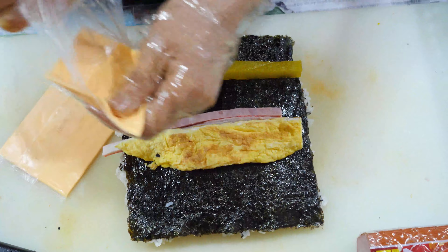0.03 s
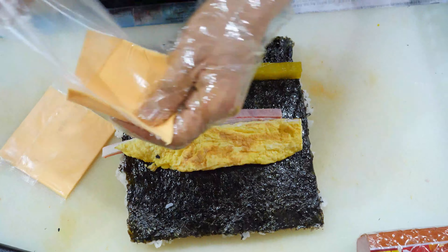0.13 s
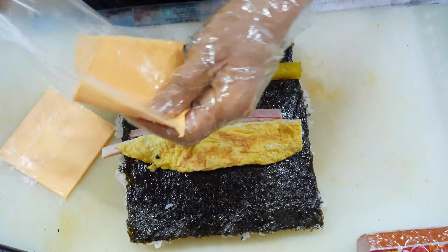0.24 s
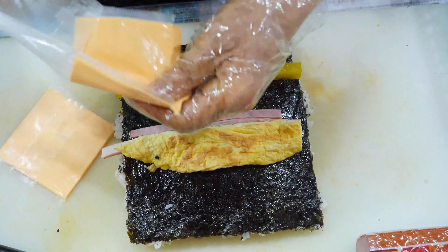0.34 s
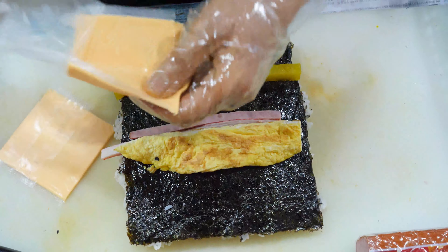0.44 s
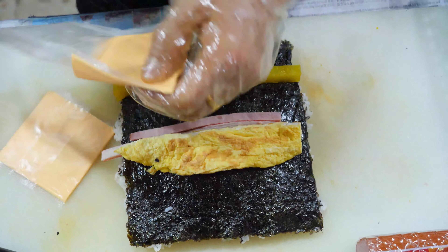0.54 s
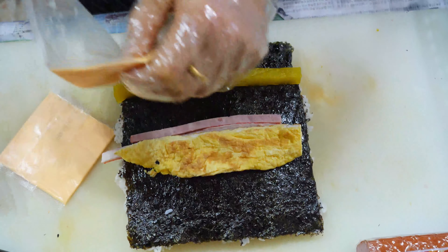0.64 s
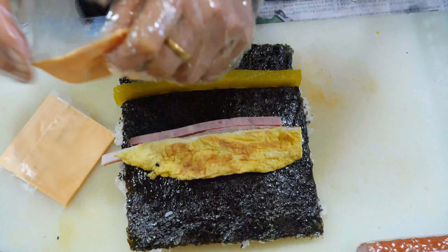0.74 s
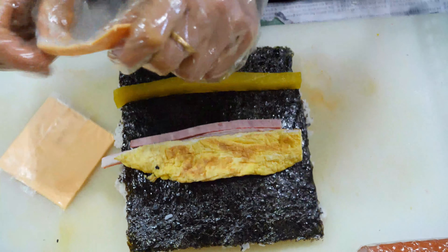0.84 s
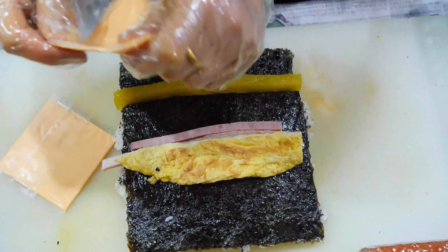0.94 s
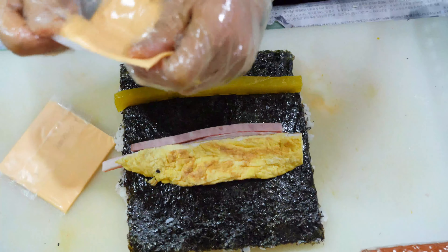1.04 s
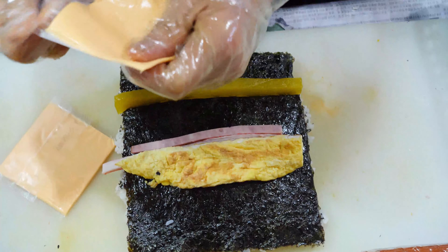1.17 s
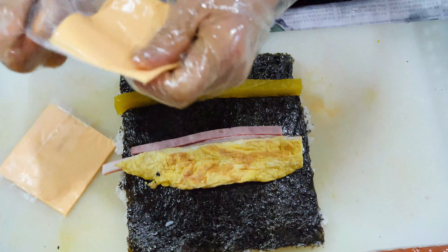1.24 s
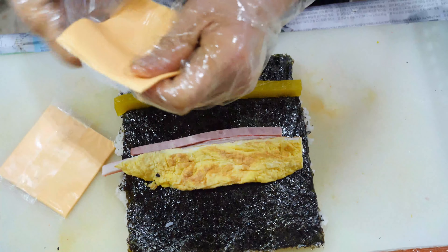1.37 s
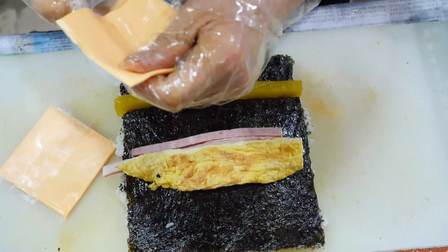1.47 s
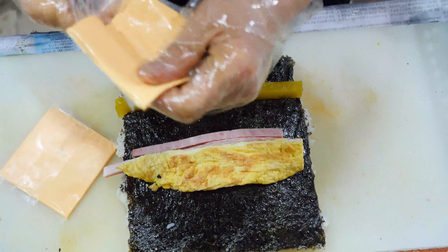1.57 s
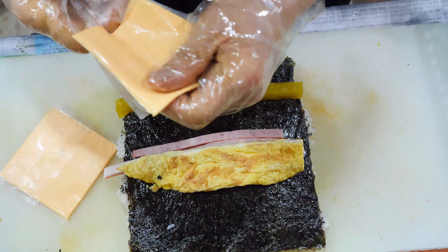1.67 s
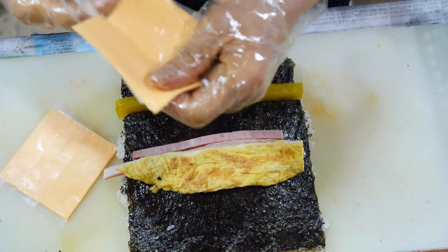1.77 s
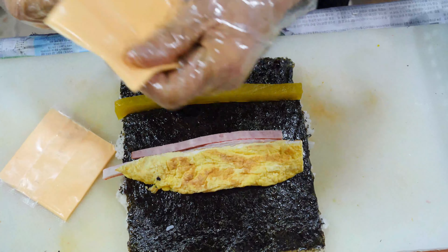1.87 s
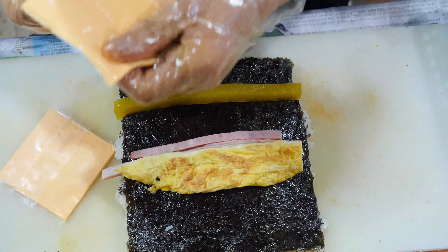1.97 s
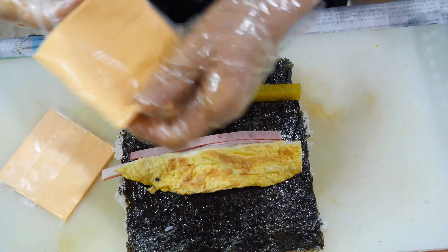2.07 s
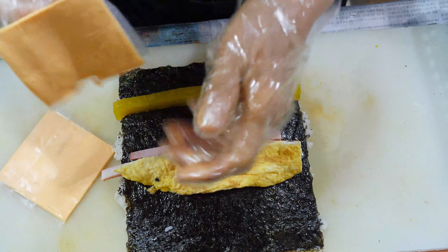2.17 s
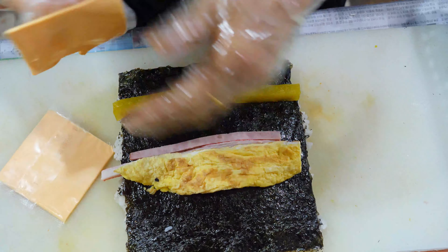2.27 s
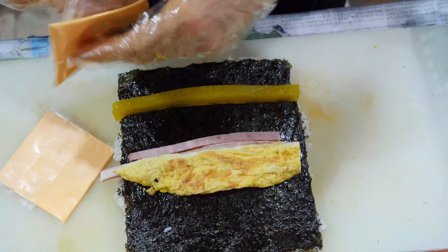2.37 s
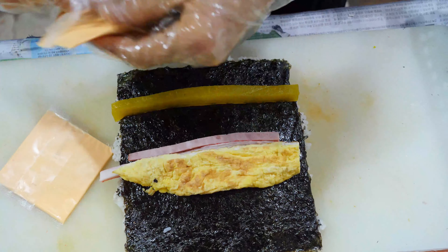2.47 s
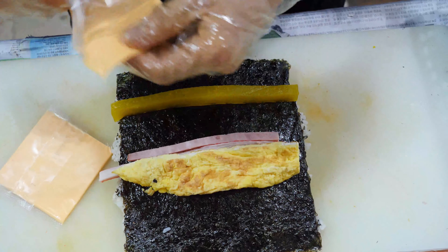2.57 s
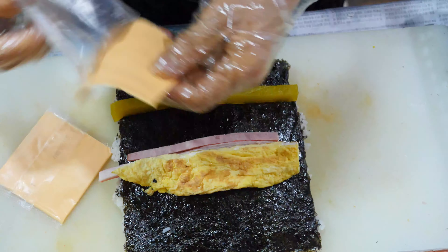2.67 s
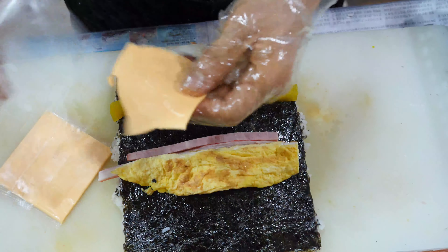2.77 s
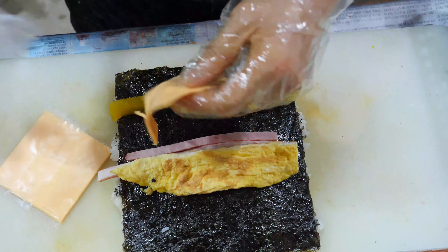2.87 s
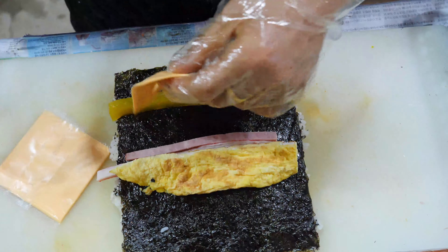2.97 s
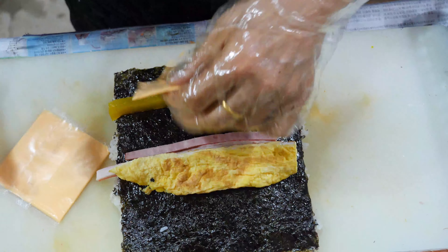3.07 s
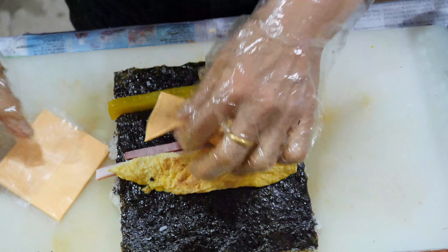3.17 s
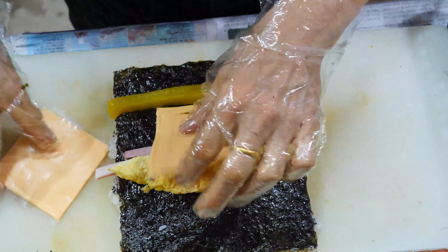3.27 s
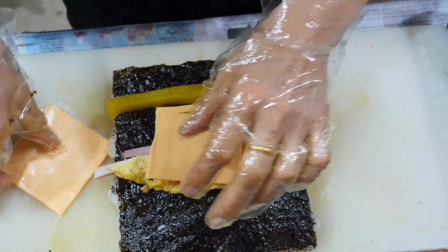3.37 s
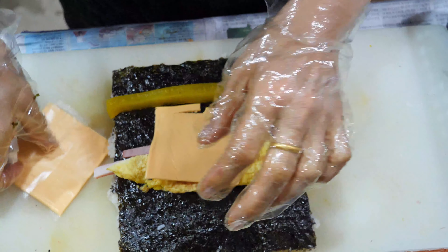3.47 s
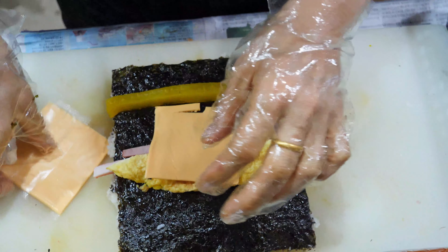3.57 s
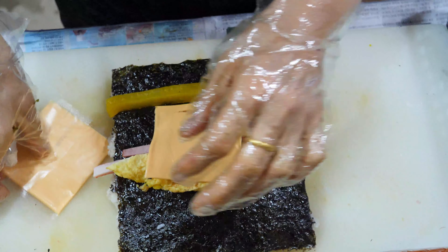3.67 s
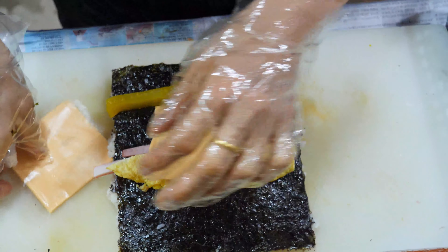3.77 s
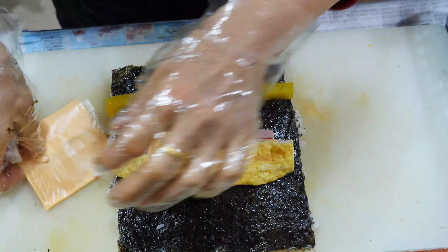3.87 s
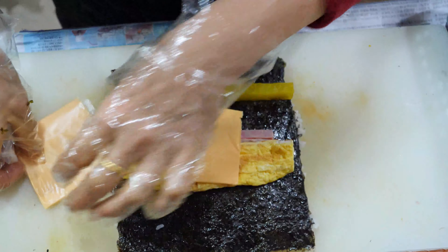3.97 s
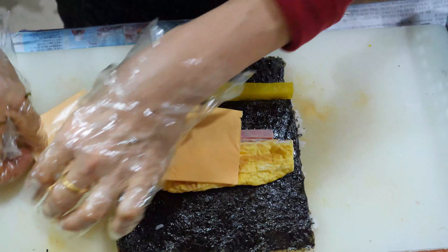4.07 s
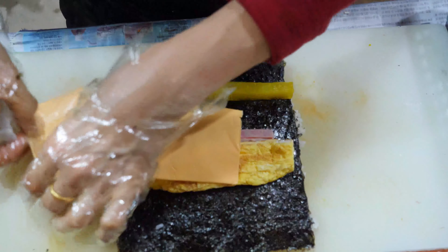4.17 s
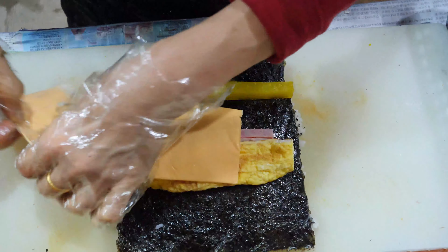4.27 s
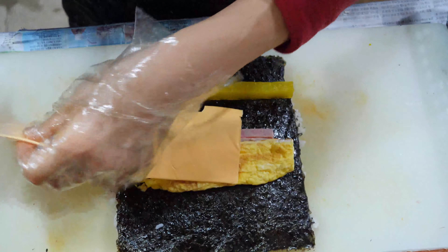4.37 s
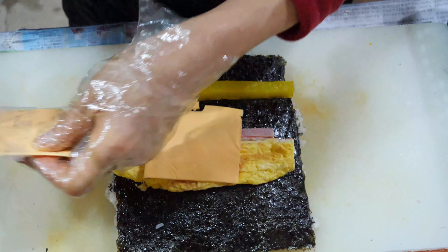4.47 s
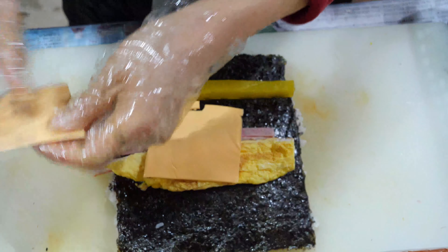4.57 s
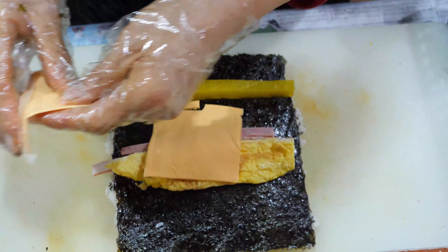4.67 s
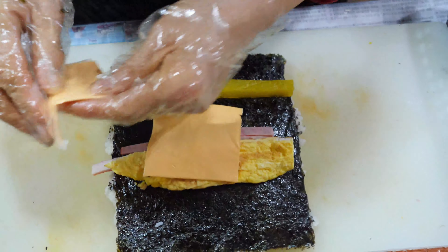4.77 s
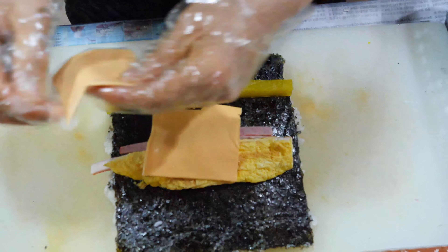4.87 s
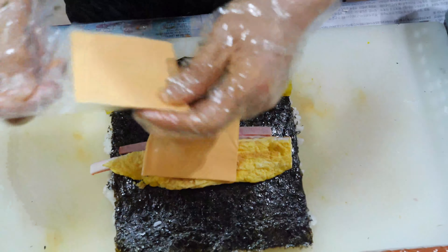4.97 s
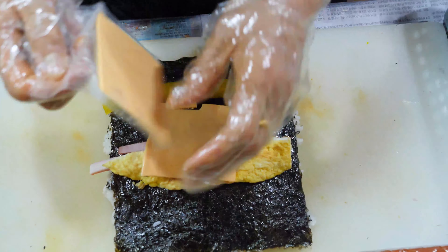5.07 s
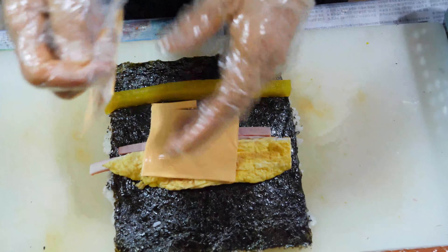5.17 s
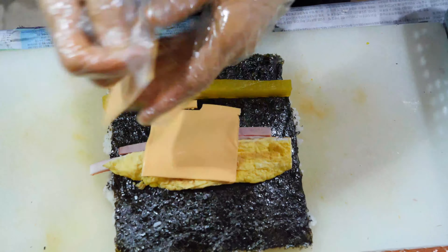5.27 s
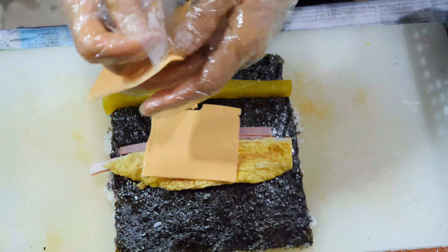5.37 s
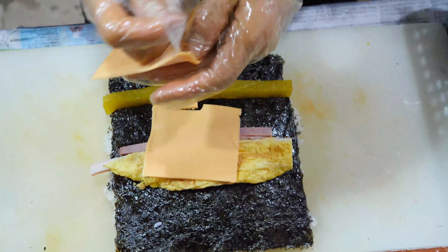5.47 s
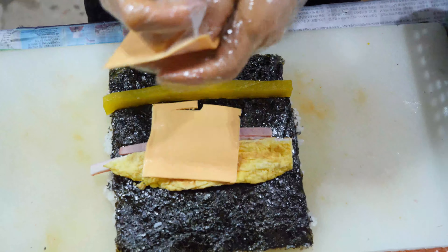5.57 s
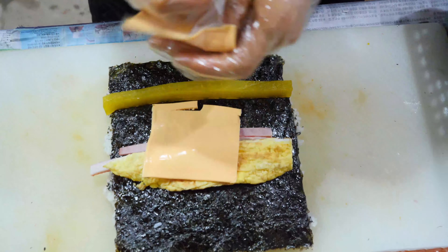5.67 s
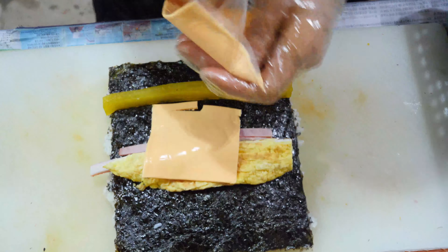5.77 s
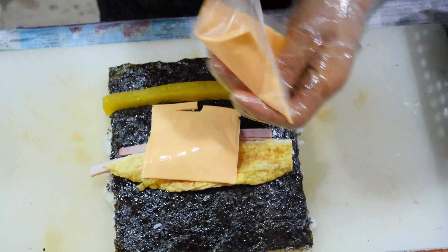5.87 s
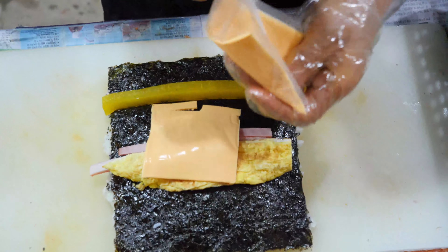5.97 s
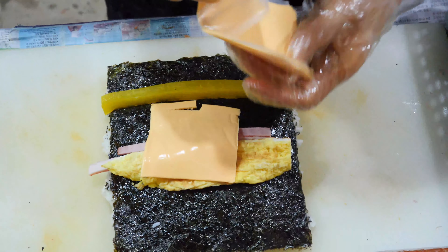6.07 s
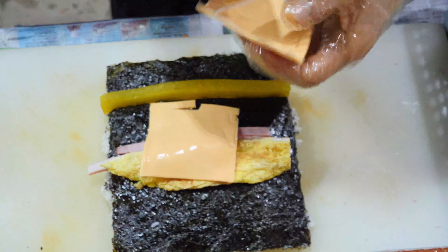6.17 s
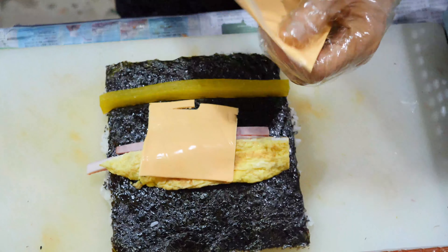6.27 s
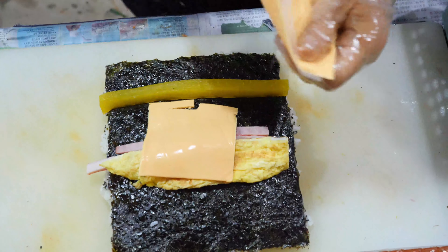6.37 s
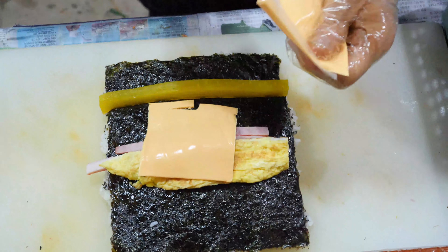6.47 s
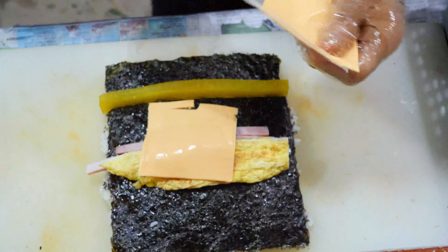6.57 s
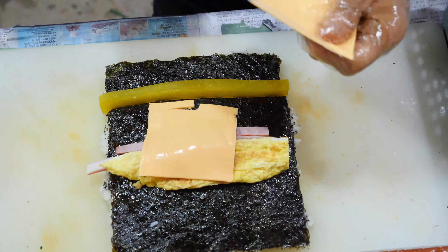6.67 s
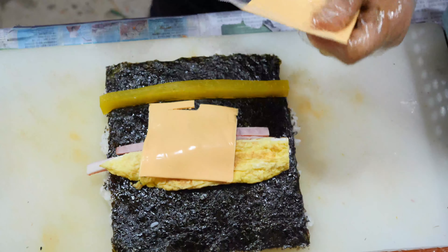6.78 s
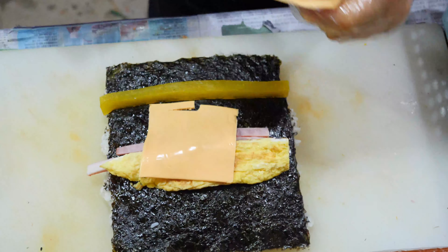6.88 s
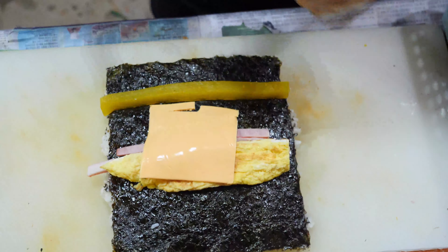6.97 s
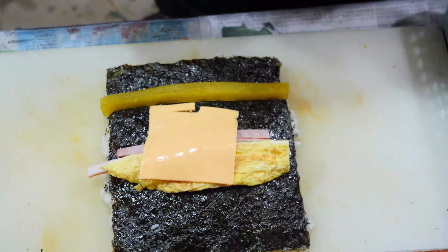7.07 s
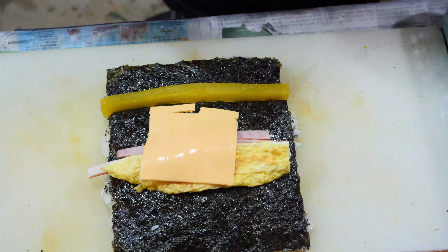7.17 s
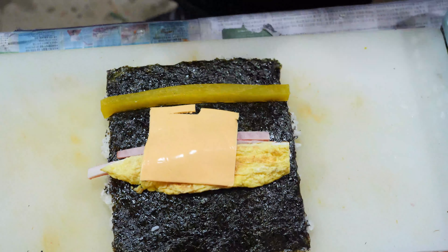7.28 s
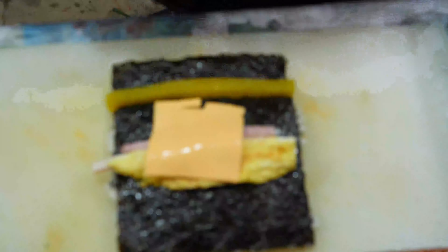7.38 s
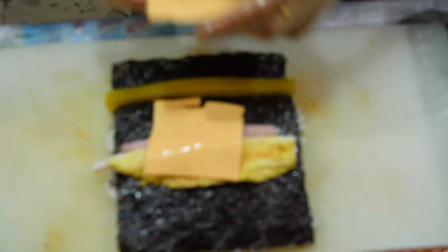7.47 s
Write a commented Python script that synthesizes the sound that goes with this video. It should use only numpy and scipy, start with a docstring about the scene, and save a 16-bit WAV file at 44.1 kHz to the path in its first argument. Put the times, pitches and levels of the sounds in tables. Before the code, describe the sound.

Plastic wrapping and gloves crinkle sharply near the microphone in uneven bursts, while a knife taps a board further off over quiet room air.

```python
"""At a food stall, gloved hands peel plastic film off cheese slices close to the microphone.
The film snaps, crackles and flaps: shaped noise pops and short pushes of low tone.
Sliding film rings a hollow pocket; further off a knife rings the modes of a board, with echoes.
A motor hum, one sine wandering in pitch and level, wavers over quiet room air made of shaped noise."""
import sys
import numpy as np
from scipy import signal
from scipy.fft import rfft, irfft
from scipy.io import wavfile
from scipy.ndimage import uniform_filter1d

SR = 44100
rng = np.random.default_rng(int(sys.argv[2]) if len(sys.argv) > 2 else 0)


def gain_from_db(level_db):
    """Convert decibel levels to linear amplitude factors (20 dB per decade)."""
    decades = np.asarray(level_db, float) / 20
    return 10 ** decades


def unload_audio(sound):
    """Save the sound as a 16-bit wav file, at the path given as the first command line argument."""
    columns = np.transpose(np.atleast_2d(sound))
    # keep every value between -1 and 1, then stretch to whole-number steps
    steps = np.round(np.clip(columns, -1, 1) * 32767)
    wavfile.write(sys.argv[1], SR, steps.astype(np.int16))


N = 331632  # length in samples


def evened(x):
    """Scales to rms 1."""
    return x / np.sqrt(np.mean(x ** 2) + 1e-20)


def read(points, hz):
    """Reads a table on a log-frequency axis."""
    f, value = np.transpose(points)
    return np.interp(np.log(hz + 1), np.log(f + 1), value)


def curve(rows):
    """Columns of a time table, one value a sample."""
    s, *columns = np.transpose(rows)
    return [np.interp(np.arange(N) / SR, s, c) for c in columns]


def colour(points, size=2048):
    """Minimum-phase impulse response: the given spectrum, with no sound ahead of the snap."""
    hz = np.abs(np.fft.fftfreq(size, 1 / SR))
    below = hz < points[0][0]
    log_gain = np.log(gain_from_db(read(points, hz) - 60 * below))
    phase = -signal.hilbert(log_gain).imag
    return np.fft.ifft(np.exp(log_gain + 1j * phase)).real[:size // 2]


def creases(points, pop_s, flutter_s, flutter_db, count=24):
    """Snaps of peak 1: a crease pops, pops again soon after, and the sheet flutters out."""
    t = np.arange(1200) / SR
    spread = np.exp(0.71 * rng.standard_normal((count, 1)))  # creases differ in length
    shape = np.exp(-t / (pop_s * spread)) + gain_from_db(flutter_db) * np.exp(-t / (flutter_s * spread))
    shape = shape * (1 - np.exp(-t / 0.000099))  # soft onset
    delays = rng.integers(40, 260, count)
    second = np.array([np.roll(s, d) * (t >= t[d]) for s, d in zip(shape, delays)])
    shape = shape + gain_from_db(rng.uniform(-21.5, 4, (count, 1))) * second
    # each crease favours its own band
    hz = np.fft.rfftfreq(len(t), 1 / SR) + 1
    lowest, highest = np.log(points[1][0]), np.log(points[-2][0])
    favoured_hz = np.exp(rng.uniform(lowest, highest, (count, 1)))
    band = gain_from_db(7.8 * np.exp(-(np.log(hz / favoured_hz) / 0.46) ** 2))
    noise = irfft(rfft(rng.standard_normal(shape.shape)) * band, len(t))
    snaps = signal.fftconvolve(shape * noise, colour(points)[None], axes=1)[:, :len(t)]
    return snaps / np.abs(snaps).max(1, keepdims=True)


# pulls, folds and grips of the film: start t/s, hold t/s, crackle treble level/dB,
# body level/dB against the treble
HAND_MOVES = [(0.0, 0.22, -30.5, -1.5), (0.332, 0.018, -35.5, -4.5), (0.509, 0.047, -36.5, -2),
              (0.599, 0.017, -41, -8), (0.909, 0.069, -34.5, -4), (1.012, 0.052, -38, -2.5),
              (1.135, 0.029, -36, -2.5), (1.196, 0.081, -39, -4), (1.347, 0.072, -38.5, -3),
              (1.463, 0.092, -39.5, 0), (1.629, 0.043, -36, -3.5), (1.786, 0.13, -42.5, -4),
              (2.149, 0.03, -36, -4.5), (2.223, 0.17, -48.5, -0.5), (2.477, 0.076, -44, -4.5),
              (2.578, 0.29, -38, -4), (2.955, 0.11, -33.5, -5.5), (3.223, 0.012, -45, -1),
              (3.35, 0.028, -45.5, -7), (3.522, 0.011, -43.5, -9), (3.9, 0.11, -48, -13),
              (4.158, 0.028, -36, -18), (4.368, 0.032, -41.5, -17), (4.458, 0.05, -43.5, -5),
              (4.723, 0.012, -47.5, -20), (4.902, 0.11, -42.5, -4), (5.032, 0.02, -32, -2.5),
              (5.13, 0.034, -43, -10), (5.262, 0.021, -40.5, -9), (5.406, 0.05, -38.5, -7),
              (5.528, 0.02, -38.5, -8), (5.67, 0.12, -45.5, -9), (5.805, 0.15, -33.5, -6),
              (6.115, 0.055, -41, -3.5), (6.365, 0.26, -40, -5.5), (6.664, 0.03, -31, -1),
              (6.861, 0.03, -34, -1), (7.222, 0.066, -42, -3.5), (7.399, 0.024, -48, 1)]


def hands():
    """Each move swells, holds and dies away over a resting rustle; stronger moves weigh more on the body."""
    rise_db_per_s, fall_db_per_s, rest_db, rest_body_db = 512, 275, -52, -8
    start, hold, level_db, body_db = np.transpose(HAND_MOVES)[:, :, None]
    t = np.arange(0, N / SR + .002, .002)
    before, after = np.maximum(start - t, 0), np.maximum(t - start - hold, 0)
    away_db = rise_db_per_s * before + fall_db_per_s * after
    power, rest = gain_from_db(level_db - away_db) ** 2, gain_from_db(rest_db) ** 2
    total = power.sum(0) + rest
    mean_body_db = ((power * body_db).sum(0) + rest * rest_body_db) / total
    return curve(np.transpose([t, 10 * np.log10(total), mean_body_db]))


# creases that pop over in film and gloves: t/s, treble peak level/dB,
# body peak level/dB against the treble
CREASE_SNAPS = [(0.0296, -20, -23), (0.0457, -11.5, -10.5), (0.1495, -13, -9), (0.2076, -9, -22),
                (0.3394, -16.5, -2.5), (0.487, -21, -6), (0.544, -18.5, -3.5), (0.612, -12, -8),
                (0.7693, -21, -22), (1.0253, -23, 8.5), (1.0352, -20, -18), (1.0508, -17, -6.5),
                (1.1617, -12, -15), (1.1961, -12, -10), (1.211, -29, -20), (1.2445, -17.5, -1),
                (1.2585, -29, -2), (1.3309, -16.5, -5), (1.4519, -11.5, -16), (1.5119, -38, -5),
                (1.6485, -14.5, -4.5), (1.8132, -17, -7.5), (1.9512, -11.5, -4.5), (2.0001, -19.5, -7),
                (2.0295, -14.5, -17.5), (2.1167, -24.5, -12), (2.1582, -17, -23), (2.762, -21.5, 0.5),
                (2.958, -17, -4), (2.992, -15.5, -16), (3.0144, -25, -35), (3.0909, -15.5, -8),
                (3.9439, -16.5, -10.5), (3.9743, -18, -26), (4.0603, -20, -28), (4.113, -20, -30),
                (4.1254, -18.5, -30), (4.184, -22, -37), (5.0015, -10.5, -21), (5.0327, -12.5, -3),
                (5.0621, -14.5, -7), (5.096, -27, 3.5), (5.166, -23.5, 1), (5.225, -11, -15),
                (5.2542, -18.5, -7), (5.4126, -17.5, -4), (5.5263, -26.5, -6), (5.5378, -12, -16.5),
                (5.6624, -17, -34), (5.7348, -17, -13.5), (5.7779, -10.5, -36), (5.8029, -10, -7),
                (5.8415, -8.5, -13), (5.8689, -13, -14), (5.9001, -13, -3.5), (5.9077, -14, -21),
                (5.9429, -20, 5), (6.1048, -11, -11), (6.125, -13, -12), (6.1828, -17, -26),
                (6.254, -17.5, -22), (6.4037, -6.5, -18), (6.4405, -15, -34), (6.463, -9, -20),
                (6.5127, -12.5, -11.5), (6.5677, -18.5, -15), (6.5932, -18, -9.5), (6.6074, -12, -16),
                (6.6257, -27, 5), (6.658, -29, 5), (6.6795, -18, -19), (6.6825, -4.5, -12),
                (6.6855, -10, -13), (6.693, -13.5, -7.5), (6.8756, -13, -20), (7.2296, -17, -8.5),
                (7.383, -16.5, -8), (7.4281, -24, 0.5)]
# treble spectrum of a snap: f/Hz, level/dB
SNAP_TREBLE = [(1500, -21), (2800, 3), (5000, 0), (8400, 0.5), (10500, -7), (14000, -5), (16500, -9)]
# body spectrum of a snap: f/Hz, level/dB
SNAP_BODY = [(200, -9.5), (450, -2.5), (900, -6), (1300, -5.5), (1650, -1.5), (2300, -1.5), (3500, -20)]
# the film flaps and pushes air at the microphone: t/s, level/dB, f/Hz
AIR_PUSHES = [(1.286, -26.5, 446), (5.03, -18.5, 470), (6.596, -23, 524), (6.679, -17, 510),
              (6.698, -23, 215), (6.762, -29.5, 206), (7.232, -25.5, 405)]


def film():
    """Creases pop: large snaps, air pushes, and a clumped crackle that thickens as the hands work harder."""
    treble = creases(SNAP_TREBLE, pop_s=0.00036, flutter_s=0.0045, flutter_db=-24.5)
    body = creases(SNAP_BODY, pop_s=0.00052, flutter_s=0.0037, flutter_db=-10.5)
    crackle_db, body_db = hands()
    clumps = evened(uniform_filter1d(rng.standard_normal(N), 250))  # creases set each other off
    busy = gain_from_db(.4 * (crackle_db + 44.0))
    per_s = 260 * busy * np.exp(.9 * clumps / (1 + .4 * busy))  # clumping is weaker in dense crackle
    happens = rng.random(N) < per_s / SR
    sizes = gain_from_db(3.86 * np.minimum(rng.exponential(1, N), 3)) * happens / np.sqrt(busy)
    kind = rng.integers(0, len(treble), N)
    out = np.zeros(N + SR)
    for family, level_db, scatter_db in ((treble, crackle_db, 2.5), (body, crackle_db + body_db, 3.5)):
        pops = sizes * gain_from_db(scatter_db * rng.standard_normal(N))  # one pop drives both, unevenly
        crackle = sum(signal.oaconvolve(pops * (kind == k), snap)[:N] for k, snap in enumerate(family))
        out[:N] += gain_from_db(level_db) * evened(crackle)
    for k, (s, peak_db, low_db) in enumerate(CREASE_SNAPS):
        snap = treble[k % len(treble)] + gain_from_db(low_db) * body[k % len(body)]
        out[round(s * SR):][:len(snap)] += gain_from_db(peak_db) * snap
    t = np.arange(1500) / SR
    for s, level_db, hz in AIR_PUSHES:
        swell = np.e * (hz * t / 0.51) * np.exp(-hz * t / 0.4)  # a cycle or two
        push = np.sin(2 * np.pi * hz * t) * swell
        out[round(s * SR):][:len(t)] += gain_from_db(level_db) * push
    return out[:N]


# the film slides off the cheese and the pocket between them rings:
# start t/s, length t/s, level/dB ahead of the arch of effort, f/Hz
FILM_SLIDES = [(4.352, 0.089, -43.5, 1750), (5.776, 0.24, -32.5, 1640)]


def peels():
    """Quick uneven slips excite a hollow pocket under one arch of effort."""
    pocket_width_hz, slips_per_s = 400, 510
    out = np.zeros(N)
    for s, length, db, hz in FILM_SLIDES:
        t = np.arange(0, length, 1 / SR)
        chance, size, sign = rng.random((SR // 2, 3)).T[:, :len(t)]
        slips = (chance < slips_per_s / SR) * np.sign(sign - .5) * (1 - size) ** -.3
        ring = np.exp(-np.pi * pocket_width_hz * t[:900]) * np.sin(2 * np.pi * hz * t[:900])
        effort = np.sin(np.pi * t / length) ** 0.59
        out[round(s * SR):][:len(t)] += gain_from_db(db) * effort * evened(np.convolve(slips, ring)[:len(t)])
    return out


# knife on the board: t/s, peak level/dB of the blow ahead of bass loss and echoes,
# level/dB of the modes under 350 Hz against the rest
KNIFE_BLOWS = [(0.056, -12, 2), (0.616, -8, -5), (1.676, -10.5, -1), (2.389, -8.5, -3), (3.033, -10.5, -3),
               (3.721, -7.5, -4), (4.486, -11.5, -7), (6.205, -9, -10)]
# modes of the board, before each blow's random variation: f/Hz, level/dB, 60 dB decay t/s
BOARD_MODES = [(74.4, -4, 0.097), (198, 0, 0.04), (263, 9, 0.018), (437, 7.5, 0.0047), (756, 1.5, 0.013),
               (1034, 15.5, 0.0093), (1380, 8.5, 0.0067), (1930, 2, 0.0038)]
# paths from the board to the microphone: delay t/s, level/dB
BOARD_PATHS = [(0, -10), (.0046, 1), (.0092, -5.5), (0.015, -12.5), (0.0214, -7), (0.0248, -5.5)]


def knife():
    """A soft-edged blow, its mode levels and pitches varied at random, arrives by several smeared paths."""
    t = np.arange(SR // 8) / SR
    contact = np.exp(-((t[:80] - t[40]) / 0.00014) ** 2)  # the blade stays on a fraction of a millisecond
    small_board = signal.butter(2, 130, "high", fs=SR, output="sos")  # it radiates little bass
    out, shared = np.zeros(N + SR), stall()
    for s, peak_db, low_db in KNIFE_BLOWS:
        variation = rng.standard_normal((len(BOARD_MODES), 2))
        ring = np.zeros(len(t))
        for (hz, db, t60), (level_shift, pitch_shift) in zip(BOARD_MODES, variation):
            mode_db = db + low_db * (hz < 350) + 1.8 * level_shift - 60 * t / t60
            ring += gain_from_db(mode_db) * np.cos(2 * np.pi * hz * (1 + .04 * pitch_shift) * t - .9)
        ring = np.convolve(ring, contact)
        ring = signal.sosfilt(small_board, gain_from_db(peak_db) * ring / np.abs(ring).max())
        paths = (shared + stall()) / np.sqrt(2)  # half the tail is shared, half drawn afresh for each blow
        for delay_s, db in BOARD_PATHS:
            at = round(delay_s * SR)
            paths[at] += gain_from_db(db)
            # rough surfaces scatter
            paths[at + rng.integers(8, 90, 3)] += gain_from_db(db - 8) * rng.standard_normal(3)
        heard = signal.fftconvolve(ring, paths)
        out[round(s * SR) - 30:][:len(heard)] += heard  # started early for the soft contact
    return out[:N]


# how fast the stall's reflections die: f/Hz, 60 dB decay t/s
STALL_DECAY = [(150, 0.35), (320, 0.37), (1300, 0.4), (2400, 0.32), (8000, 0.23)]


def stall():
    """A tail of energy 1: sparse reflections of random sign, each band dying at its own speed."""
    taps = np.zeros(SR // 2)
    at = np.arange(300, len(taps) - 20, 20)
    taps[at + rng.integers(0, 20, len(at))] = rng.choice([-1., 1.], len(at))
    hz, t, z = signal.stft(taps, SR, nperseg=512)
    decay = gain_from_db(-60 * t / read(STALL_DECAY, hz)[:, None])
    tail = signal.istft(z * decay, SR, nperseg=512)[1]
    return tail / np.linalg.norm(tail)


# a motor somewhere off, before its tremble: t/s, f/Hz, level/dB
MOTOR_HUM = [(0, 140, -58), (.9, 140, -68), (1.2, 150, -51), (1.6, 135, -62), (2.05, 124, -54.5),
             (2.12, 125.9, -50), (2.35, 133, -49), (2.55, 135, -41), (2.8, 138, -48.5), (2.9, 140, -55),
             (3.7, 145, -62), (4, 143, -50), (4.4, 128, -62), (6.5, 138, -57.5), (7.2, 145, -59),
             (7.52, 143, -65)]


def hum():
    """A sine that wanders in pitch and level and trembles a little in both."""
    hz, level_db = curve(MOTOR_HUM)
    smooth = uniform_filter1d(rng.standard_normal((2, N)), 2500, axis=1)
    tremble = evened(uniform_filter1d(smooth, 2500, axis=1))
    turns = np.cumsum(hz * (1 + 0.0093 * tremble[0])) / SR
    return gain_from_db(level_db + 2.5 * tremble[1]) * np.sqrt(2) * np.sin(2 * np.pi * turns)


# spectrum of the room air, relative: f/Hz, level/dB per Hz
AIR_SPECTRUM = [(15, -29), (25, 15.5), (85, -7), (135, 2.5), (313, -8), (1470, -9.5), (1730, -5.5),
                (2900, -17), (8370, -17.5), (14000, -35), (15200, -56), (16500, -51)]


def air():
    """Room air: random short-time spectra with drifting patches."""
    frames, hz = N // 512 + 5, np.fft.rfftfreq(2048, 1 / SR)
    real, imaginary, patches = rng.standard_normal((frames, 1025, 3)).T
    patches = evened(uniform_filter1d(uniform_filter1d(patches, 16, 0), 8, 1))
    z = (real + 1j * imaginary) * gain_from_db(read(AIR_SPECTRUM, hz)[:, None] + 1.6 * patches)
    noise = signal.istft(z, nperseg=2048, noverlap=1536)[1][:N]
    return gain_from_db(-49.5) * evened(noise)  # rms level in dB


def scene():
    """Film near with a little of the stall's tail, knife far, hum and air around."""
    near = film() + peels()
    reflected = gain_from_db(-14.5) * signal.fftconvolve(near, stall())[:N]
    return (near + reflected + knife() + hum() + air())[None]


def band_limit(x):
    """A steep low-pass at the top of the band."""
    return signal.sosfilt(signal.butter(12, 16980, fs=SR, output="sos"), x)


def record(dry):
    """A linear-phase low-pass at 15400 Hz takes off the top of the treble."""
    low_pass = signal.firwin(255, 15400, window=("kaiser", 3), fs=SR)
    limited = signal.oaconvolve(dry, low_pass[None], "same")
    return band_limit(limited)


dry = scene()
out = record(dry)
unload_audio(out)
```